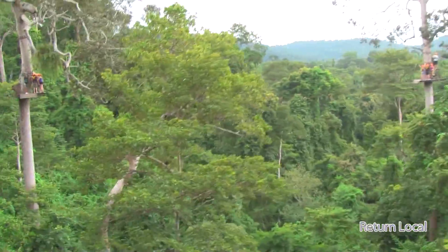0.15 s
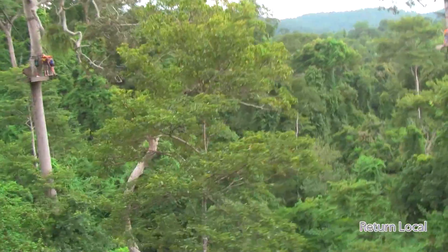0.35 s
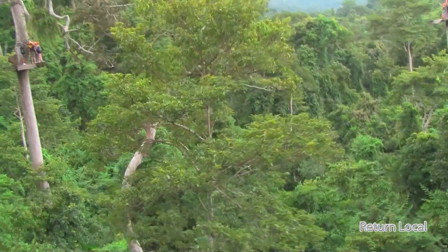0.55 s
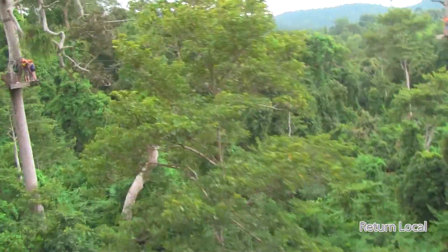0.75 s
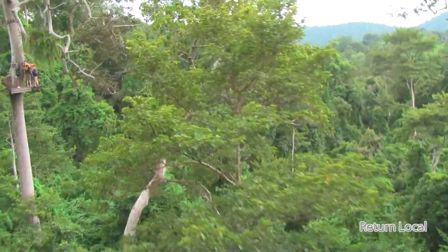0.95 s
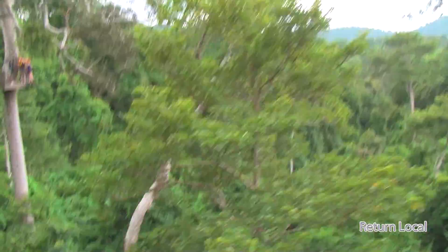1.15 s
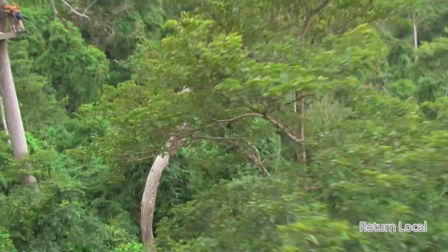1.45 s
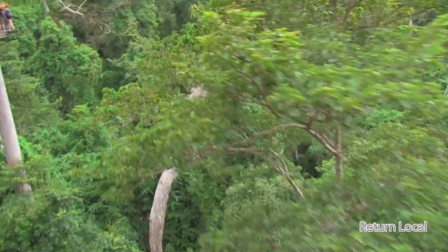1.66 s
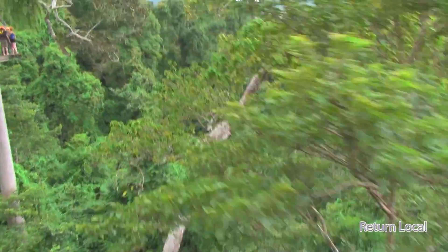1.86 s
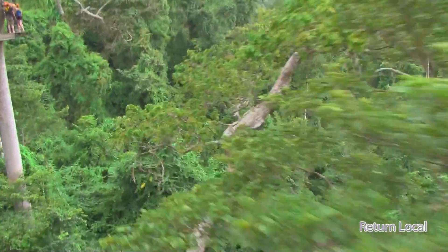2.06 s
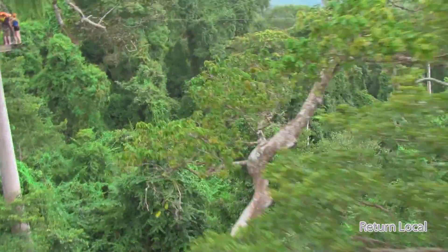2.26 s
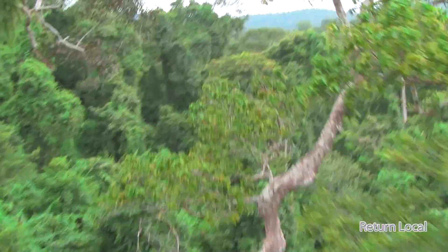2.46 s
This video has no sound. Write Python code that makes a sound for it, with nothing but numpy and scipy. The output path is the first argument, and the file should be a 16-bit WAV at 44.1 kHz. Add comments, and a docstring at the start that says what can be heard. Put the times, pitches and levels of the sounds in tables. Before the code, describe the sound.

A zipline trolley is already running fast at 0 s and never stops through 2.6 s: dense, gritty steel hiss with little bass. A singing metallic whir wavers, edges upward until about 1.5 s, then drops lower near 1.7 s. A tiny hitch comes around 2.1 s, then brighter hiss. Faint hum and soft air rush grow in the second half. Close, left-leaning, dry open air.

```python
"""A zipline trolley runs fast along a steel cable above a forest, close by on the left.
Its sheaves (grooved wheels) grind over the strands: shaped noise makes a dense, rough hiss.
Noise ringing narrow bands makes the drifting metal resonances; jittery sines make a wavering hum.
Low-pitched noise is the air rushing softly past, growing in the second half."""
import sys
import numpy as np
from scipy.fft import rfft, irfft
from scipy.io import wavfile
from scipy.ndimage import map_coordinates

SR = 44100
rng = np.random.default_rng(int(sys.argv[2]) if len(sys.argv) > 2 else 0)


def transcribe(u):
    """Save the signal u as a 16-bit wav file named by the first command-line argument.

    u: samples, shape (n,) or (channels, n), limited to [-1, 1]; the rate is SR.
    q: integer samples, one column per channel.
    """
    v = np.clip(np.atleast_2d(u).T, -1, 1)
    q = np.round(v * 32767).astype(np.int16)
    wavfile.write(sys.argv[1], SR, q)


N = 114660  # samples, 2.6 s


def amp(db):
    """Turn decibels into a plain multiplier."""
    return 10 ** (np.asarray(db) / 20)


def unit(x):
    """Scale a sound to an average strength (rms) of 1."""
    return x / np.sqrt(np.mean(x ** 2) + 1e-20)


def along(points, hz):
    """Read a table of (f/Hz, value) at any frequency, joining its points on a log axis."""
    f, v = np.transpose(points)
    return np.interp(np.log(hz + 1), np.log(f + 1), v)


def curves(rows):
    """Give one value per sample for each column after the time."""
    s, *columns = np.transpose(rows)
    t = np.arange(N) / SR
    return [np.interp(t, s, column) for column in columns]


def wobble(rate):
    """A smooth random curve with this many random points a second."""
    knots = rng.standard_normal(N)
    return map_coordinates(knots, [np.arange(N) * rate / SR], mode="wrap")


def filtered(x, response):
    """Reshape the spectrum of x by a response over frequency; the ends wrap round."""
    return irfft(rfft(x) * response(np.fft.rfftfreq(N, 1 / SR)), N)


# soft rush of air
# t/s, level/dB (before the AIR_DB trim)
AIR_LEVEL = [(0, -64), (1.5, -62.5), (1.85, -57), (2.6, -58.5)]
# f/Hz, level/dB (relative)
AIR_COLOUR = [(20, -30), (60, -34), (125, -10), (170, -4.5), (280, 0.5), (400, -1), (1200, -25)]
AIR_DB = 2.5


def air():
    """Passing air makes a soft low rush: noise kept mostly to the low frequencies."""
    noise = rng.standard_normal((2, N))
    rush = filtered(noise, lambda hz: amp(along(AIR_COLOUR, hz)))
    return amp(AIR_DB + curves(AIR_LEVEL)[0]) * unit(rush)


TICKS_PER_S, TICK_SPREAD_DB = 900, 4
TICK_SHARE = 0.12  # part of the power that comes from knocks


def friction():
    """Two contact forces, smooth rubbing plus tiny knocks of the wires at shared moments."""
    struck = rng.random(N) < TICKS_PER_S / SR
    knocks = struck * amp(TICK_SPREAD_DB * rng.standard_normal(N))
    knocks = unit(knocks * rng.choice([-1, 1], (2, N)))
    rubbing = rng.standard_normal((2, N))
    return np.sqrt(1 - TICK_SHARE) * rubbing + np.sqrt(TICK_SHARE) * knocks


def broad(level, colour):
    """Friction shaped by a broad colour, following a level curve."""
    shaped = filtered(friction(), lambda hz: amp(along(colour, hz)))
    return amp(curves(level)[0]) * unit(shaped)


def resonance(centre_hz, width_hz):
    """Friction rings a resonance whose centre may move; rms 1."""
    turn = np.exp(2j * np.pi * np.cumsum(centre_hz * np.ones(N)) / SR)
    pole = 1 / (1 + 2j * np.fft.fftfreq(N, 1 / SR) / width_hz)
    # shift the centre down to 0 Hz, keep a narrow band there, then shift it back
    band = np.fft.ifft(np.fft.fft(friction() / turn) * pole ** 2)
    return unit((band * turn).real)


# hum of the sheaves rolling over the strands
# t/s, f/Hz (pitch before jitter), level/dB (fundamental), level/dB (octave)
HUM_PATH = [(0, 563, -74, -49), (.5, 572, -66.5, -43), (1.26, 563, -59.5, -49), (1.35, 590, -57, -58),
            (1.48, 598, -51, -53), (1.64, 568, -56, -49), (1.74, 585, -55.5, -39.5), (1.87, 574, -67, -46),
            (1.96, 564, -54.5, -39.5), (2.04, 543, -62, -52), (2.12, 570, -46.5, -46),
            (2.19, 578, -57, -37), (2.25, 584, -50, -44.5), (2.31, 572, -54, -42.5), (2.44, 560, -58, -41),
            (2.5, 584, -56, -46), (2.6, 570, -66, -41)]
HUM_JITTER_HZ, HUM_FLUTTER_DB, HUM_FLUTTER_PER_S = 6.5, 3, 60
DRONE_HZ, DRONE_WIDTH_HZ = 505, 84
DRONE_DB = -5.5  # relative to the fundamental


def hum():
    """Rolling over the strands gives a wavering, slightly rough tone, its octave and a weaker drone."""
    pitch_hz, first_db, octave_db = curves(HUM_PATH)
    jittered_hz = pitch_hz + HUM_JITTER_HZ * wobble(HUM_FLUTTER_PER_S)
    phase = 2 * np.pi * np.cumsum(jittered_hz) / SR

    def partial(k):
        """The k-th harmonic, with its own flutter in strength."""
        return unit(np.sin(k * phase) * amp(HUM_FLUTTER_DB * wobble(HUM_FLUTTER_PER_S)))

    tone = amp(first_db) * partial(1) + amp(octave_db) * partial(2)
    return tone + amp(first_db + DRONE_DB) * resonance(DRONE_HZ, DRONE_WIDTH_HZ)


# resonances that stay at one pitch while their strength changes
# t/s, level/dB
ROAR_LEVEL = [(0, -58), (.42, -42), (1.15, -40), (1.35, -36.5), (1.54, -35.5), (1.7, -40.5), (2.04, -40.5),
              (2.2, -39), (2.6, -40)]
# t/s, level/dB
SIZZLE_LEVEL = [(0, -47), (.45, -47), (1.1, -37.5), (1.48, -36.5), (1.6, -56)]
# t/s, level/dB
GLINT_LEVEL = [(.5, -55), (1, -51.5), (1.35, -56.5), (1.78, -49.5), (2.05, -65)]
ROAR_HZ, SIZZLE_HZ, GLINT_HZ = 1353, 4630, 8930
ROAR_WIDTH_HZ, SIZZLE_WIDTH_HZ, GLINT_WIDTH_HZ = 280, 650, 1340


def steady_resonances():
    """Metal parts ring at fixed pitches, swelling and fading."""
    roar = amp(curves(ROAR_LEVEL)[0]) * resonance(ROAR_HZ, ROAR_WIDTH_HZ)
    sizzle = amp(curves(SIZZLE_LEVEL)[0]) * resonance(SIZZLE_HZ, SIZZLE_WIDTH_HZ)
    glint = amp(curves(GLINT_LEVEL)[0]) * resonance(GLINT_HZ, GLINT_WIDTH_HZ)
    return roar + sizzle + glint


# drifting resonances of trolley and cable
# t/s, f/Hz (centre), level/dB
RASP_PATH = [(0, 2564, -38.5), (.6, 2604, -40), (1.15, 2575, -40.5), (1.36, 2650, -35), (1.55, 2660, -35),
             (1.75, 2460, -36.5), (2.2, 2480, -41), (2.6, 2460, -38)]
# t/s, f/Hz (centre), level/dB
BURR_PATH = [(.24, 2630, -43), (.39, 2870, -36.5), (1.1, 3000, -44.5), (1.3, 3000, -39),
             (1.52, 3234, -45.5), (1.8, 2740, -42.5), (2.2, 2840, -37), (2.45, 2820, -40.5)]
# t/s, f/Hz (centre), level/dB
RING_PATH = [(0, 4190, -36), (.17, 4130, -34), (.45, 4290, -37), (.8, 4230, -38), (.95, 3920, -38),
             (1.2, 3880, -41.5), (1.45, 4310, -44), (1.72, 4250, -35), (1.97, 4100, -33),
             (2.16, 4230, -37.5), (2.3, 4220, -35), (2.6, 4190, -33.5)]
# t/s, f/Hz (centre), level/dB
SHEEN_PATH = [(.2, 4770, -45), (.45, 4930, -38.5), (.9, 5300, -44.5), (1.12, 5200, -48),
              (1.45, 5720, -41.5), (1.57, 5100, -36), (1.96, 5060, -36), (2.07, 5100, -38.5),
              (2.25, 5380, -38.5), (2.6, 5110, -36.5)]
RASP_WIDTH_HZ, BURR_WIDTH_HZ, RING_WIDTH_HZ, SHEEN_WIDTH_HZ = 450, 440, 460, 610


def drifting(path, width_hz):
    """One resonance whose centre and strength follow a table."""
    centre_hz, db = curves(path)
    return amp(db) * resonance(centre_hz, width_hz)


def drifting_resonances():
    """Trolley and cable ring at pitches that drift, trading strength."""
    lower = drifting(RASP_PATH, RASP_WIDTH_HZ) + drifting(BURR_PATH, BURR_WIDTH_HZ)
    upper = drifting(RING_PATH, RING_WIDTH_HZ) + drifting(SHEEN_PATH, SHEEN_WIDTH_HZ)
    return lower + upper


# main resonance of the trolley
# t/s, f/Hz (centre, before the core's jitter), level/dB (noise band), level/dB (singing core)
WHIRR_PATH = [(0, 1978, -35, -38), (.22, 1903, -35, -40.5), (.5, 2022, -36, -32.5), (.95, 2024, -33.5, -48),
              (1.12, 2054, -33, -40), (1.25, 2030, -35, -55), (1.45, 2152, -36, -54),
              (1.62, 1850, -41, -50), (1.72, 1818, -37.5, -42), (2.02, 1760, -40, -43),
              (2.36, 1823, -31.5, -39), (2.6, 1786, -41, -40)]
WHIRR_WIDTH_HZ = 380
CORE_JITTER_HZ, CORE_JITTER_PER_S = 74.7, 350


def whirr():
    """The trolley's main resonance: a noise band around a jittery singing core that fades midway."""
    centre_hz, band_db, core_db = curves(WHIRR_PATH)
    jittered_hz = centre_hz + CORE_JITTER_HZ * wobble(CORE_JITTER_PER_S)
    core = unit(np.sin(2 * np.pi * np.cumsum(jittered_hz) / SR))
    return amp(band_db) * resonance(centre_hz, WHIRR_WIDTH_HZ) + amp(core_db) * core


METAL_LOW_HZ = 774  # the resonances radiate little below this


def metal():
    """All the metal resonances together, which radiate hardly any bass."""
    ringing = whirr() + drifting_resonances() + steady_resonances()
    return filtered(ringing, lambda hz: hz ** 4 / (hz ** 4 + METAL_LOW_HZ ** 4))


# hiss of the strands
# t/s, level/dB (before the HISS_DB trim)
HISS_LEVEL = [(0, -48), (.25, -48), (.36, -45), (1.15, -46), (1.42, -45), (2.02, -46), (2.22, -41),
              (2.6, -42.5)]
# f/Hz, level/dB (relative)
HISS_COLOUR = [(3000, -40), (4800, -19), (5600, 12), (6200, 9.5), (7000, 6.5), (7900, 4), (8600, 0),
               (9700, -2.5), (10500, -4), (15000, -53)]
# fine fizz on top
# t/s, level/dB (before the FIZZ_DB trim)
FIZZ_LEVEL = [(0, -45.5), (.65, -48.5), (1, -45), (1.3, -47), (1.8, -47), (2.05, -51.5), (2.2, -47.5),
              (2.6, -48)]
# f/Hz, level/dB (relative)
FIZZ_COLOUR = [(5000, -46), (7600, -0.5), (9000, -1.5), (10500, -4), (12000, 4), (13600, -2), (14900, 6.5),
               (15200, -7), (16500, -5.5)]
HISS_DB, FIZZ_DB = 0.5, -0.5
FLICKER_DB, FLICKER_PER_S = 1.4, 260


def treble():
    """Steel rolling on the strands hisses and fizzes, with a fast flicker in strength."""
    flicker = amp(FLICKER_DB * wobble(FLICKER_PER_S))
    hiss = amp(HISS_DB) * broad(HISS_LEVEL, HISS_COLOUR)
    fizz = amp(FIZZ_DB) * broad(FIZZ_LEVEL, FIZZ_COLOUR)
    return flicker * (hiss + fizz)


# broad grinding of the sheaves on the cable
# t/s, level/dB (before the GRIND_DB trim)
GRIND_LEVEL = [(0, -38.5), (.2, -38), (.5, -38), (1.12, -37.5), (1.33, -36.5), (1.6, -37.5), (2.04, -41.5),
               (2.2, -38.5), (2.6, -42)]
# f/Hz, level/dB (relative)
GRIND_COLOUR = [(150, -39), (680, -15), (950, -4), (1200, -0.5), (1400, -3), (1650, -1), (2300, -2),
                (2900, -10.5), (3400, -6), (4600, -9.5), (5400, -12), (6200, -42), (9000, -64)]
GRIND_DB = 3.5


def grind():
    """Steel rolling on steel gives the broad, rough body of the sound."""
    return amp(GRIND_DB) * broad(GRIND_LEVEL, GRIND_COLOUR)


# the contact bites or slackens briefly
# t/s (middle), t/s (length), level/dB (change)
BITES_AND_DIPS = [(2.066, .004, 3.5), (2.08, .01, -4.5)]
CHATTER_DB, CHATTER_PER_S = 0.78, 270
JUDDER_DB, JUDDER_PER_S = 0.2, 90


def contact():
    """Pressure of the sheaves on the cable: fast chatter, slower judder, a brief bite and slackening."""
    t = np.arange(N) / SR
    brief_db = sum(db * np.exp(-((t - s) / length) ** 2) for s, length, db in BITES_AND_DIPS)
    chatter_db = CHATTER_DB * wobble(CHATTER_PER_S)
    judder_db = JUDDER_DB * wobble(JUDDER_PER_S)
    return amp(chatter_db + judder_db + brief_db)


# how the microphone pair hears the two sides
# f/Hz, level/dB (left over right)
LEAN = [(700, 7.5), (1300, 8), (2400, 10), (3400, 11.5), (4200, 11), (5200, 12), (6500, 10), (8000, 2),
        (12000, -2.5), (14900, -2), (15300, 21)]
# f/Hz, likeness of the two sides (0 to 1)
ALIKE = [(40, .85), (130, .997), (1500, .997), (3000, .975), (4300, .94), (5200, .86), (6000, .5),
         (8000, .33), (10500, .33), (12000, .58), (15000, .72)]
# f/Hz, phase by which left leads right (rad)
LEAD = [(3200, 0), (4000, -.5), (5800, -.1), (6800, -2.3), (9500, -2.9), (11200, -6.2), (15000, -6)]


def microphones(pair):
    """The left port faces the trolley; the shaded right one is less like it in the treble."""
    hz = np.fft.rfftfreq(N, 1 / SR)
    alike, lean, lead = along(ALIKE, hz), amp(along(LEAN, hz)), along(LEAD, hz)
    a, b = rfft(pair)
    left = lean * a
    right = (alike * a + np.sqrt(1 - alike ** 2) * b) * np.exp(-1j * lead)
    # divide by the strength of the two sides' average, so the stereo spread keeps the tone
    centre = np.sqrt(lean ** 2 + 1 + 2 * lean * alike * np.cos(lead)) / 2
    return irfft(np.array([left, right]) / centre, N)


def scene():
    """Everything the trolley makes shares the contact pressure; the air does not."""
    trolley = contact() * (grind() + treble() + metal() + hum())
    return microphones(trolley + air())


TOP_HZ = 16580


def record(dry):
    """Nothing is kept from the band limit upward."""
    return filtered(dry, lambda hz: hz < TOP_HZ)


dry = scene()
out = record(dry)
transcribe(out)
```